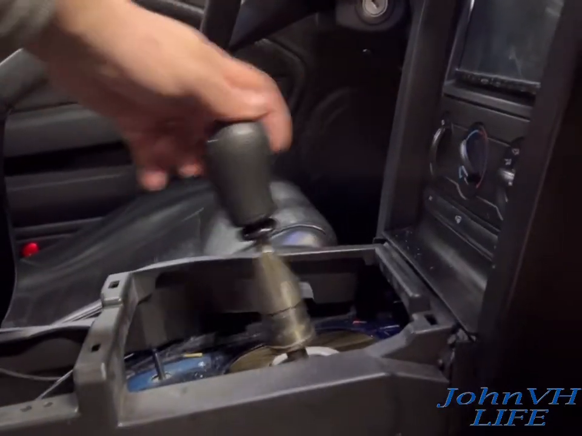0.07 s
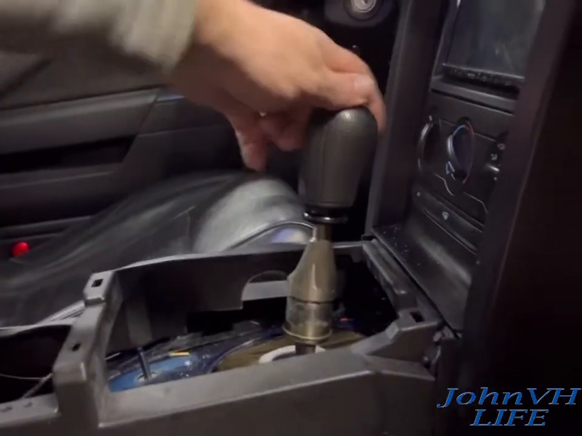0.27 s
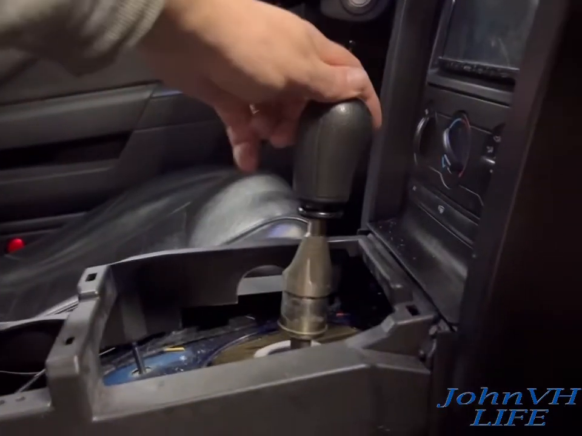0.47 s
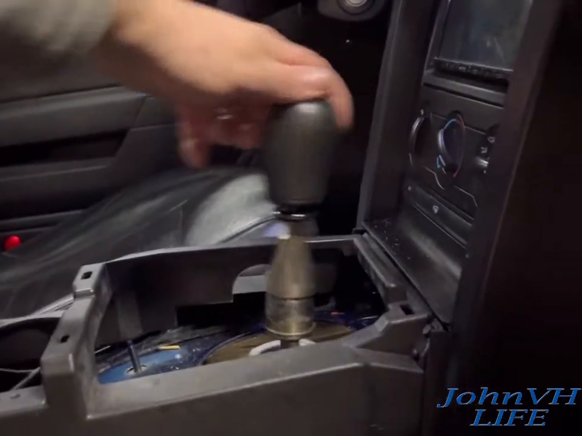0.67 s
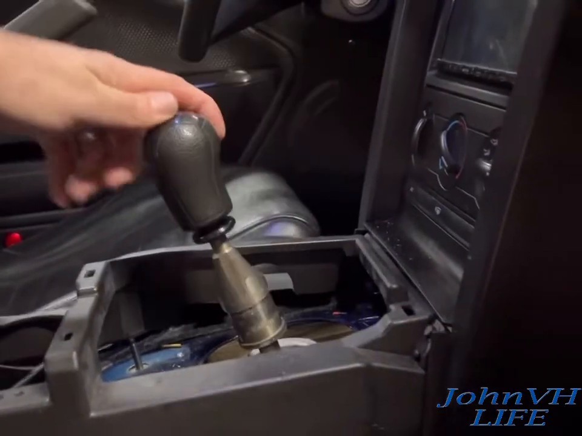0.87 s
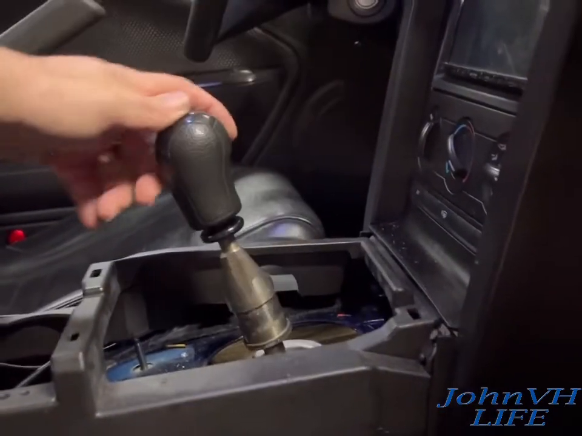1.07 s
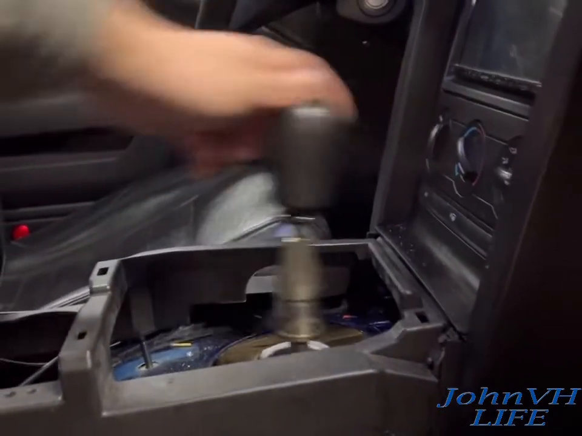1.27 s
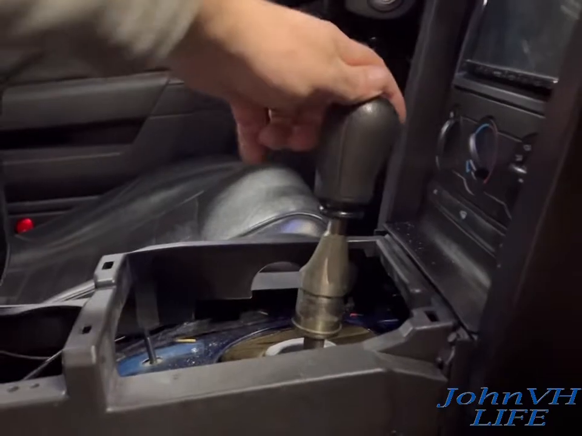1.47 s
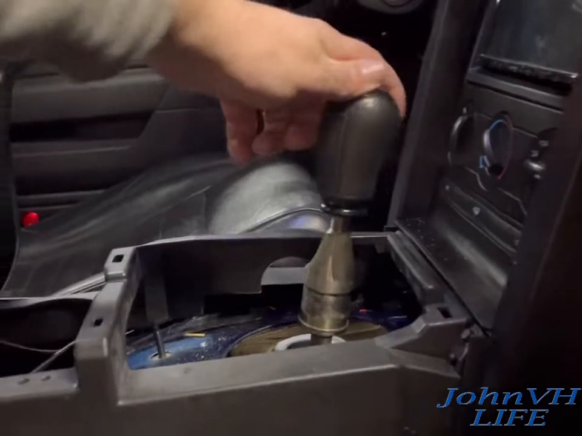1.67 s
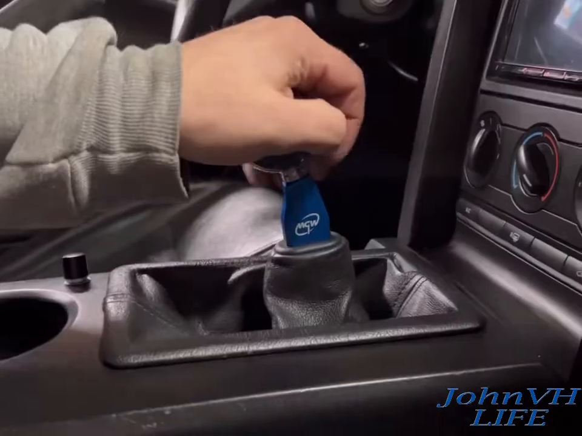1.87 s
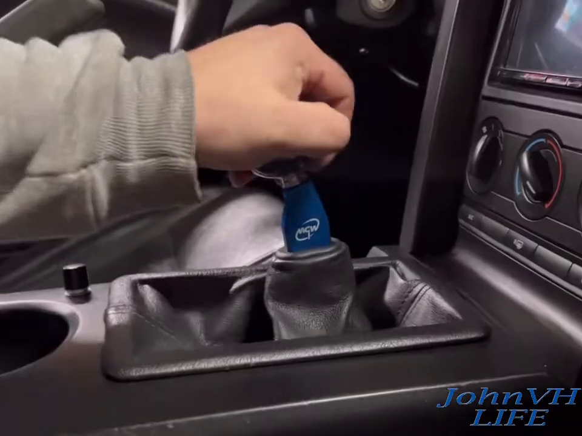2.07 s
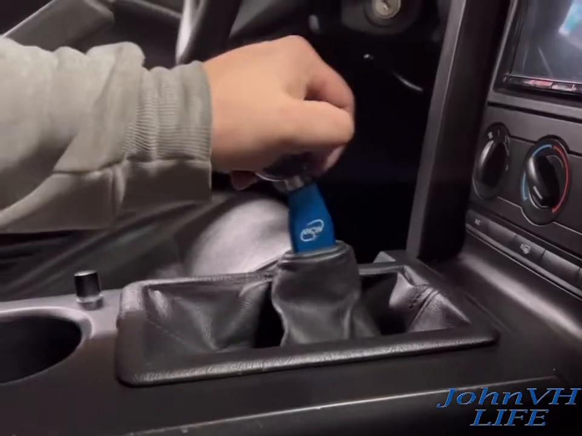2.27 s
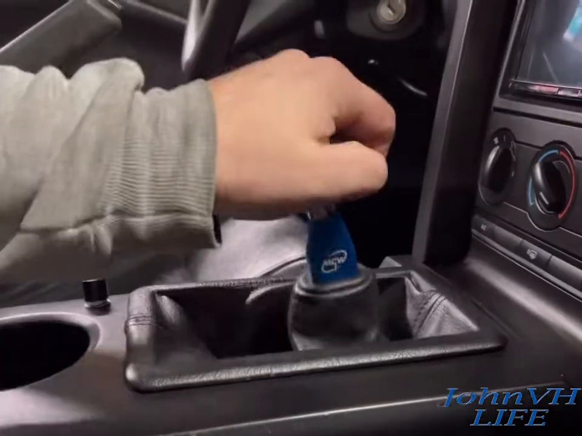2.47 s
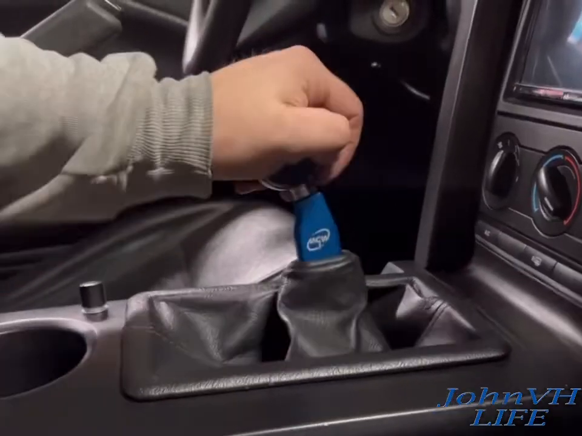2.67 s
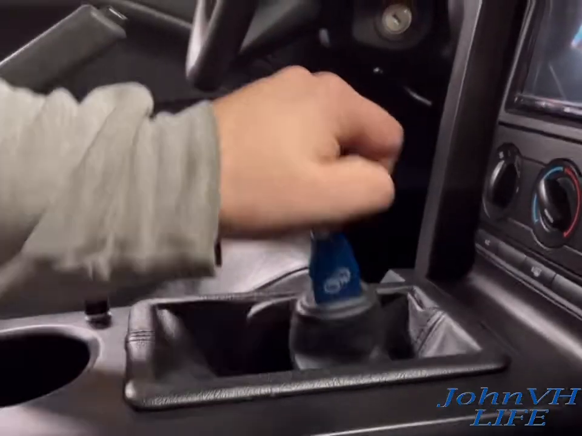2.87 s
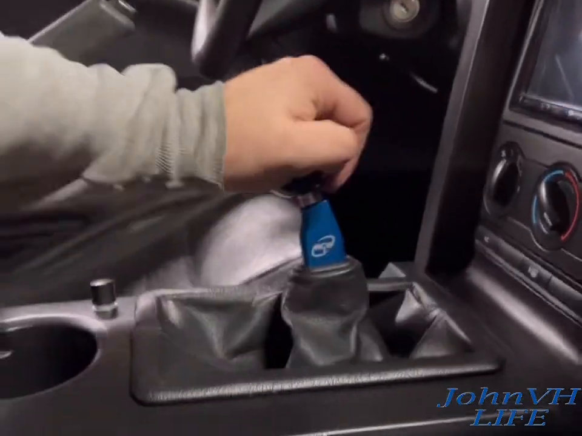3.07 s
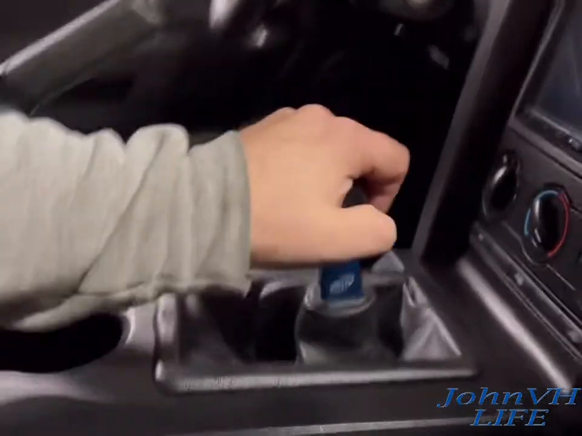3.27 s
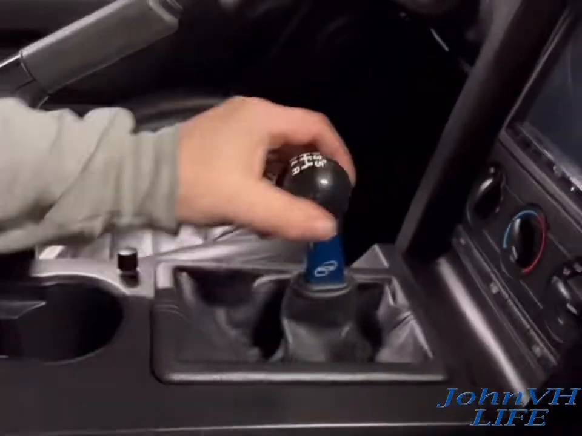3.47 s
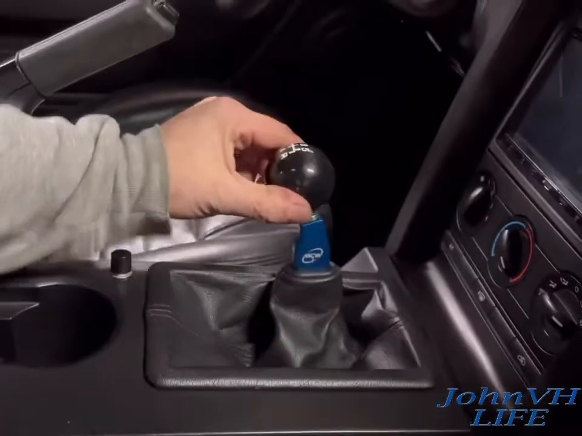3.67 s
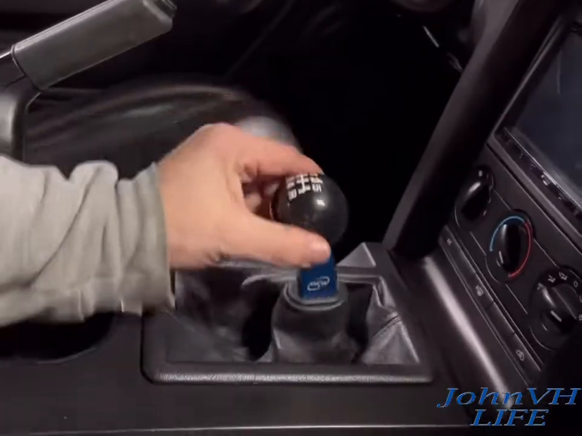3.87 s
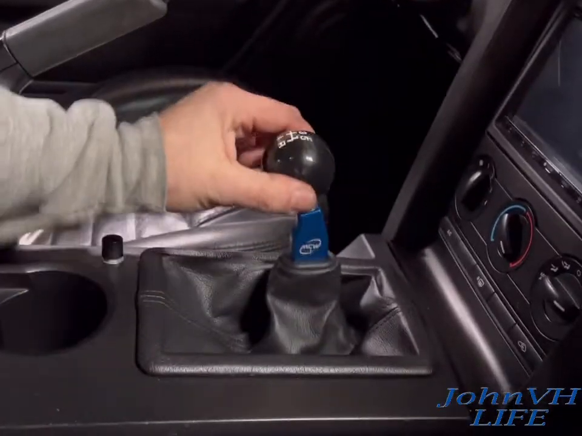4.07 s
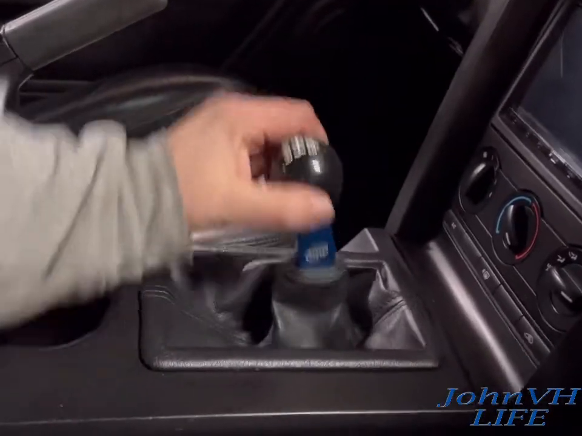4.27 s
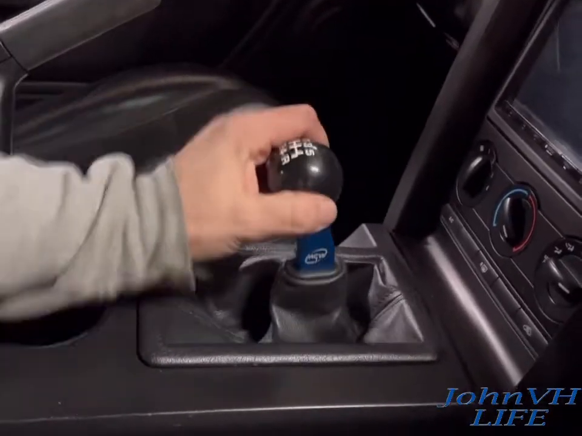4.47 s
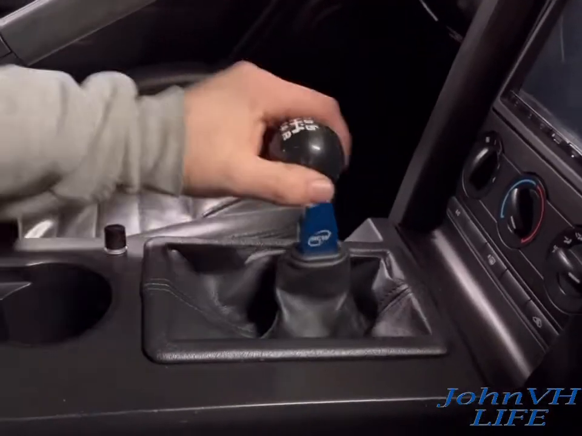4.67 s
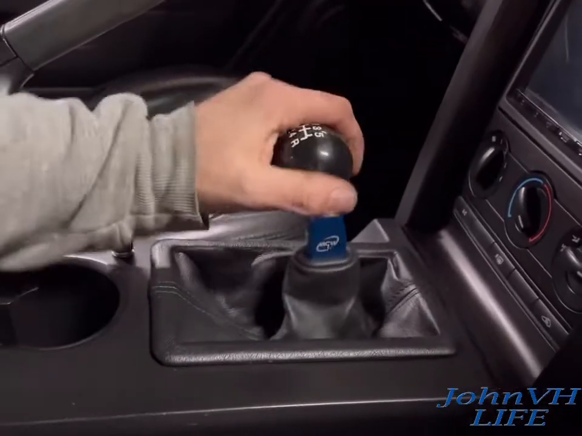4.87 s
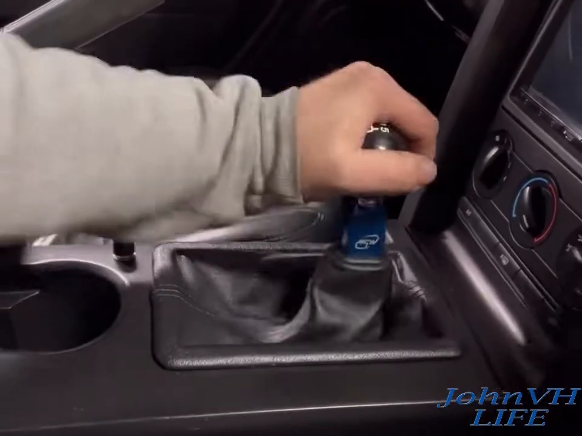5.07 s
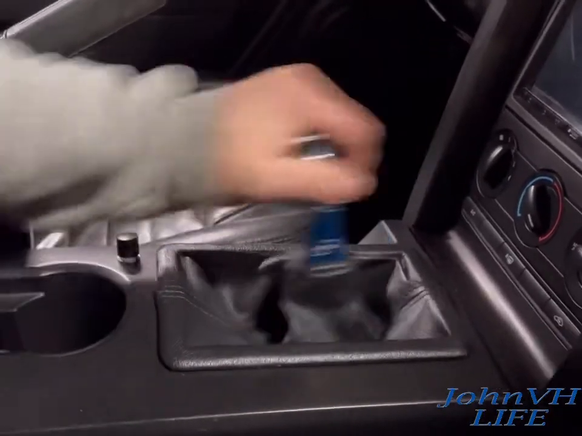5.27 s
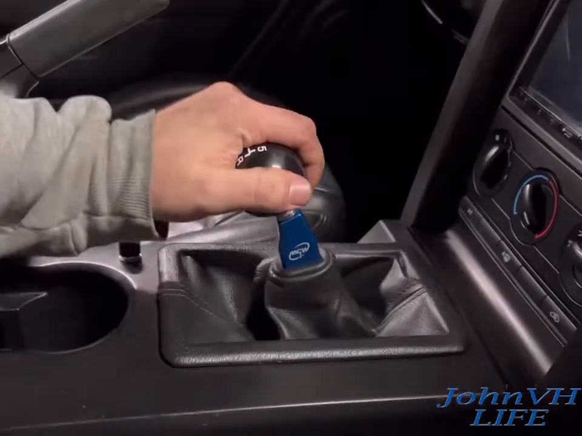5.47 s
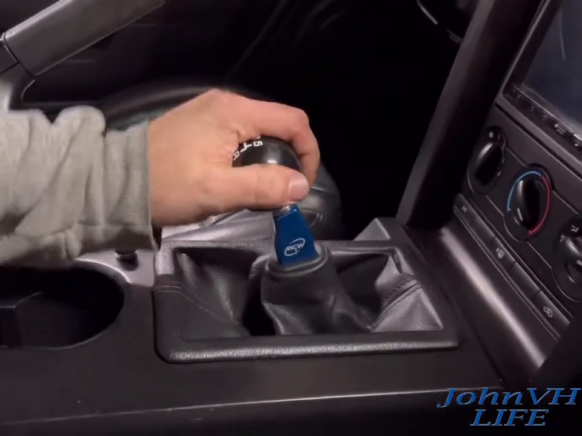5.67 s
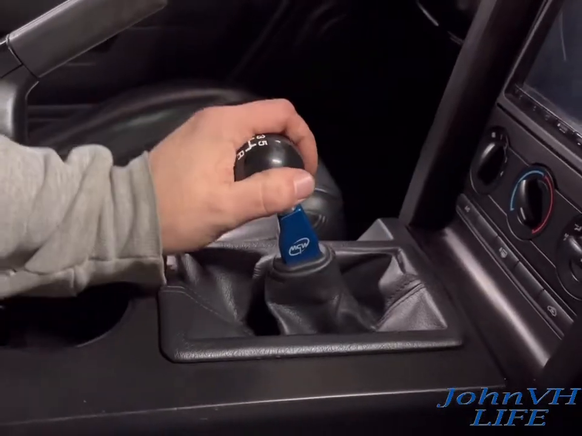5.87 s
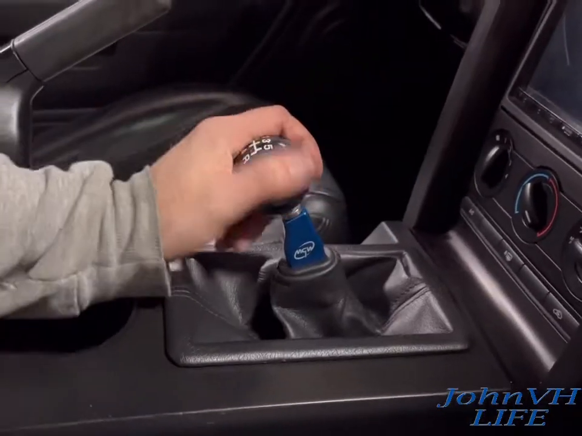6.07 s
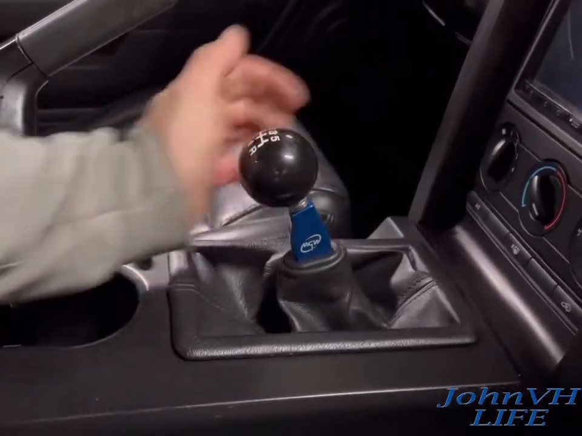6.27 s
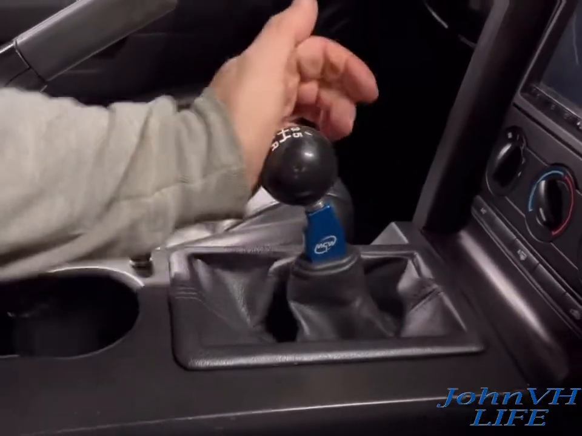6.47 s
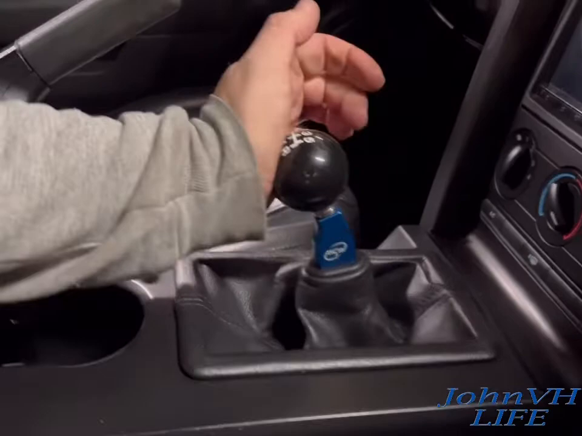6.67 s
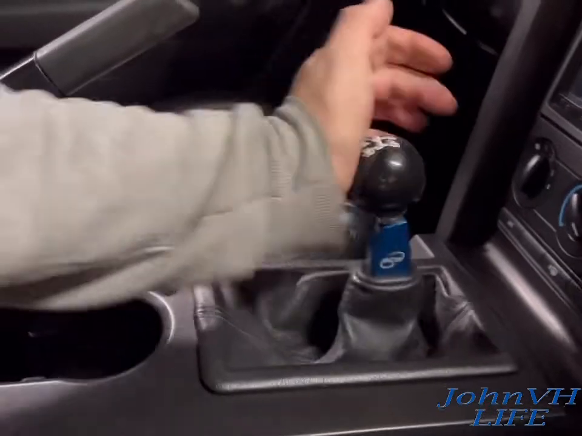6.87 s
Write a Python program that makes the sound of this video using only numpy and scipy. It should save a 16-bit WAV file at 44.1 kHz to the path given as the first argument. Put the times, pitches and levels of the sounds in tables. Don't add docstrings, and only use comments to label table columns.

```python
import sys
import numpy as np
from scipy import signal
from scipy.fft import rfft, irfft, next_fast_len
from scipy.io import wavfile
from scipy.ndimage import uniform_filter1d

SR = 44100
rng = np.random.default_rng(int(sys.argv[2]) if len(sys.argv) > 2 else 0)


def digitize_waveform(pressure):
    field = np.atleast_2d(pressure).T
    bounded = np.clip(field, -1, 1)
    quanta = np.round(bounded * 32767).astype(np.int16)
    wavfile.write(sys.argv[1], SR, quanta)


def voltage_ratio(decibels):
    exponent = np.asarray(decibels, float) / 20
    return 10 ** exponent


N = 304731
CUT_S = 1.84

# pitch_hz, level_db [rms]
HUM_PARTIALS = [(120, -68), (241, -62), (323, -77)]
# freq_hz, t60_s
ROOM_DECAY = [(250, 0.18), (700, 0.12), (2000, 0.064), (5000, 0.32), (11000, 0.054)]
# freq_hz, left_minus_right_db
STEREO_BALANCE = [(60, -3), (150, -3.5), (450, 0), (1000, -0.5), (2000, -0.5), (4500, 6), (9000, -1.5)]
# freq_hz, likeness [0-1]
STEREO_LIKENESS = [(100, 1), (250, 0.94), (500, 0), (1200, 0.2), (3000, 0), (7000, 0.5), (12000, 0.95)]
# freq_hz, lead_rad
STEREO_LEAD = [(0, 0), (430, 1.04), (860, 1.77), (1120, 0.42), (3620, 1.5), (4820, 3.5), (6290, 5),
               (6980, 7.5), (8350, 11), (9300, 9), (10900, 15.5), (15600, 11.5)]

# freq_hz, density_db [per Hz]
BARE_BED_COLOUR = [(25, -15.5), (42, 5), (87, -1.5), (145, -12.5), (248, -28), (325, -28), (403, -24.5),
                   (543, -30), (1190, -30), (2820, -41), (4580, -45), (6800, -46), (10000, -66.5),
                   (14000, -69.5)]
# freq_hz, density_db [per Hz]
BOOT_BED_COLOUR = [(25, -31), (52, 0.5), (76, -5.5), (150, -9), (200, -21), (280, -38), (400, -30.5),
                   (730, -41), (1850, -45.5), (2150, -44.5), (2450, -45.5), (5000, -48.5), (6600, -48),
                   (8000, -59), (10300, -50), (13000, -53.5)]
# time_s, effort_db [above rest]
BARE_HAND_EFFORT = [(0, 4.5), (0.25, 8), (0.5, -2), (0.66, -1.5), (0.78, 17.5), (0.92, 1.5), (1.09, 0),
                    (1.28, 9.5), (1.7, -3), (1.82, 15)]
# time_s, effort_db [above rest]
BOOT_HAND_EFFORT = [(1.9, -2), (2.2, 7.5), (2.39, 8), (2.51, 8), (2.62, 9.5), (2.76, 10), (3.07, 8.5),
                    (3.35, 10), (3.56, 7.5), (3.81, 9.5), (4.5, 9.5), (4.8, 3.5), (5.37, 12.5), (5.6, 3),
                    (6.2, 1.5), (6.6, 9.5), (6.77, 4), (6.85, 23), (6.91, 20.5)]
# crest_s, level_db, half_length_s
BARE_SLEEVE = [
    (0.073, -66, 0.13),
    (0.759, -62, 0.045),
]
# crest_s, level_db, half_length_s
BOOT_SLEEVE = [(2.199, -88, 0.18), (2.75, -78.5, 0.13), (3.379, -70.5, 0.23), (3.581, -80.5, 0.052),
               (4.502, -73, 0.21), (5.2, -70, 0.068), (5.348, -58.5, 0.036), (5.92, -74.5, .13),
               (6.53, -75, 0.07), (6.91, -62, 0.067)]
# crest_s, pitch_hz, peak_db, length_ms
RUB_WHISTLES = [
    (0.49, 4651, -62, 140),
    (1.97, 2083, -77.5, 130),
    (3.45, 2090, -71.5, 150),
]

# crest_s, pitch_hz, peak_db, length_ms
LEATHER_SQUEAKS = [(4.475, 3970, -61, 11), (4.6, 4020, -56, 14), (4.607, 5300, -58, 22),
                   (4.612, 3250, -65, 42), (4.682, 3200, -61.5, 20), (4.82, 3800, -69.5, 30),
                   (4.87, 3860, -73.5, 31), (4.94, 3820, -70, 20)]
# freq_hz, density_db [per Hz]
CREAK_COLOUR = [(200, 4.5), (330, 1), (700, -10), (1500, -23.5), (4000, -41)]
# start_s, crest_s, level_db, t60_s
GATE_SLIDES = [
    (2.067, 2.142, -59.5, 0.17),
    (2.548, 2.675, -59.5, 0.16),
    (2.923, 3.072, -50.5, 0.026),
    (4.986, 5.061, -43.5, 0.51),
    (5.253, 5.311, -36, 0.5),
    (6.775, 6.838, -56.5, 0.16),
]
# freq_hz, density_db [per Hz]
GRIND_COLOUR = [(400, -1.5), (880, -16), (1350, -13.5), (1900, -14), (2350, -14), (2550, -15.5),
                (2800, -12.5), (3600, -19.5), (5150, -16), (5800, -24), (8150, -28), (10400, -74),
                (12600, -49.5), (15900, -66.5)]
# pitch_hz, level_db [over the grit]
HOUSING_RINGS = [(872, 16), (1150, 14.5), (1604, 6), (2530, 12), (5240, 2)]

# crest_s, peak_db, pitch_hz, length_ms
BARE_BOOMS = [(0.103, -33.5, 108, 6.6), (0.13, -33, 66.7, 34), (0.195, -17.5, 73, 27.6),
              (0.55, -40.5, 91.7, 25), (0.722, -29, 120, 8.4), (0.745, -18.5, 73.6, 17),
              (0.781, -22, 90, 14), (0.806, -17, 86.6, 26), (0.886, -29.5, 58, 70), (0.987, -34, 53.5, 37),
              (1.09, -33.5, 85.6, 19), (1.25, -31, 93, 26), (1.295, -22, 72, 4.3), (1.325, -23.5, 86.5, 35),
              (1.785, -18.5, 80.5, 9.2)]
# crest_s, peak_db, pitch_hz, length_ms
ROCK_BOOMS = [(2.148, -32.5, 114.4, 25), (2.319, -20.5, 89.8, 14), (2.345, -21, 90, 9.1),
              (2.385, -35, 95.2, 34), (2.437, -17.5, 97.8, 15), (2.544, -34.5, 94, 46),
              (2.593, -18, 97.6, 15), (2.615, -18.5, 103, 11), (2.65, -22.5, 104.4, 39),
              (2.807, -23.5, 118, 13), (2.84, -15, 103.7, 16.5), (2.975, -21, 99, 5.3),
              (3.028, -15, 98, 32.6), (3.108, -25.5, 89.5, 18), (3.198, -20.5, 86.5, 20),
              (3.231, -16.5, 109, 18.7), (3.384, -25, 111, 12), (3.544, -28.5, 110.7, 23),
              (3.641, -33.5, 104.3, 18), (3.793, -18.5, 95, 8), (3.91, -28.5, 93.3, 17),
              (3.974, -26, 121.8, 59), (3.996, -19, 106.7, 11), (4.148, -28, 116.5, 18),
              (4.168, -19.5, 80, 11), (4.272, -31.5, 116.3, 8.2), (4.303, -21.5, 107.3, 26),
              (4.447, -28.5, 108, 19), (4.482, -27, 103, 27)]
# crest_s, peak_db, pitch_hz, length_ms
GEAR_BOOMS = [(4.621, -20.5, 108.4, 13.6), (4.999, -26, 140, 16), (5.033, -12.5, 96.8, 13),
              (5.049, -6, 88.4, 6.7), (5.064, -5.5, 94.4, 12), (5.245, -34, 78.3, 13.5),
              (5.292, -17, 92.6, 17), (5.313, -7, 96.4, 10), (5.358, -4.5, 101.6, 12.7),
              (5.441, -23, 85, 13), (5.57, -33, 57.8, 65), (5.759, -38.5, 53.6, 72),
              (6.355, -13, 108.5, 14.9), (6.514, -37, 84, 9.7), (6.813, -21.5, 117, 16),
              (6.838, -25.5, 104.3, 27), (6.869, -16.5, 92.7, 6.1), (6.89, -23.5, 97, 7.1)]

# start_s, pitch_hz, peak_db, t60_s
BARE_RINGS = [(0.094, 1156, -50, 0.14), (0.097, 502, -31.5, 0.08), (0.101, 840, -43.5, 0.11),
              (0.1615, 2740, -32.5, 0.012), (0.1618, 2270, -36, 0.029), (0.1621, 1740, -40, 0.028),
              (0.1624, 1262, -36, 0.044), (0.1627, 788, -41.5, 0.061), (0.164, 500, -22, 0.13),
              (0.708, 1074, -44, 0.066), (0.711, 472, -33.5, .13), (0.773, 1247, -33, 0.027),
              (0.774, 1071, -29, 0.038), (0.777, 491, -20.5, 0.056), (0.777, 2820, -51, 0.043),
              (0.779, 769, -34, 0.059), (0.79, 2050, -51.5, 0.27), (1.218, 793, -42.5, .13),
              (1.222, 445, -36.5, 0.26), (1.291, 3690, -47, 0.026), (1.292, 1257, -48, 0.084),
              (1.293, 583, -41, 0.05), (1.294, 466.5, -23.5, 0.083), (1.756, 1060, -45, 0.092),
              (1.76, 472, -34.5, 0.14), (1.81, 1286, -48, 0.077), (1.8255, 3470, -42, 0.06),
              (1.826, 1340, -34, 0.052), (1.8265, 1060, -25.5, 0.062), (1.827, 513, -28.5, 0.12)]
# start_s, pitch_hz, peak_db, t60_s
BOOT_RINGS = [(2.176, 257, -44, 0.069), (2.29, 334, -46.5, .07), (2.315, 313, -50, 0.076),
              (2.54, 730, -50.5, 0.13), (2.543, 336, -50.5, .07), (2.572, 580, -52, 0.056),
              (2.775, 353, -43.5, 0.067), (2.83, 312, -45.5, 0.095), (2.964, 705, -51, 0.26),
              (2.965, 562, -50.5, 0.17), (2.97, 358, -47.5, 0.13), (3.055, 1390, -43, 0.039),
              (3.056, 534, -47.5, 0.097), (3.07, 330, -47, 0.085), (3.158, 335, -43, 0.12),
              (3.16, 581, -54.5, 0.15), (3.34, 1070, -58, 0.079), (3.35, 395, -57, 0.21),
              (3.76, 572, -53.5, 0.18), (3.96, 528, -46, .1), (4.255, 1136, -63, 0.065),
              (4.27, 502, -55.5, 0.11), (4.565, 552, -53, 0.14), (4.965, 596, -46, 0.061),
              (4.968, 340, -50, 0.039), (5.027, 1030, -32.5, 0.02), (5.028, 530, -23, 0.053),
              (5.03, 337.6, -22.5, 0.075), (5.04, 1430, -45.5, .17), (5.05, 2080, -47.5, 0.079),
              (5.07, 1327, -54, .45), (5.235, 510, -45.5, 0.057), (5.282, 980, -41.5, 0.065),
              (5.288, 403, -27, 0.091), (5.323, 952, -19, 0.02), (5.324, 588, -23, 0.053),
              (5.325, 327, -22, 0.065), (5.326, 729, -18.5, 0.036), (5.335, 1130, -45, 0.15),
              (5.35, 492, -37, 0.19), (5.37, 880, -55.5, 0.83), (6.32, 584, -43, 0.072),
              (6.49, 518, -54, 0.15), (6.785, 910, -49, 0.1), (6.825, 937, -46, 0.065)]

# start_s, peak_db, treble_db [over peak]
DETENT_TICKS = [(0.081, -44, 2), (0.085, -37, -1.5), (0.142, -36.5, -0.5), (0.698, -34.5, 4),
                (0.75, -46, 0.5), (1.03, -52, -2), (1.078, -38.5, -4), (1.083, -41.5, -2),
                (1.199, -39.5, 3.5), (1.204, -43.5, -3), (1.267, -33.5, 8), (1.744, -41.5, 3.5),
                (1.818, -28, 1.5)]
# pitch_hz, level_db, t60_s
DETENT_MODES = [(3610, -4, .015), (3900, 0, .013), (4300, -1, .017), (5870, -12, .012), (8310, -6, .022),
                (9260, -9, .018), (14200, -14, .012)]
# freq_hz, density_db [per Hz]
DETENT_CRACK = [(500, -1), (1500, -13.5), (2800, -4.5), (4000, -7.5), (6000, -15.5), (8400, -9.5),
                (10300, -6.5), (14000, -18), (15900, -28.5)]
# start_s, peak_db, treble_db [over peak]
LOOSE_TICKS = [(6.141, -41.5, -33.5), (6.189, -43, -34), (6.237, -53, -43), (6.278, -43.5, -31),
               (6.295, -44, -32.5), (6.309, -40.5, -0.5), (6.319, -33.5, -32.5), (6.467, -43.5, -30.5),
               (6.497, -44, -27.5), (6.515, -41.5, -27.5), (6.586, -41.5, -26), (6.624, -38, -28.5),
               (6.64, -37, -27.5), (6.685, -37, -25), (6.696, -38.5, -21)]
# freq_hz, density_db [per Hz]
LOOSE_CRACK = [(250, 10.5), (600, -6.5), (1400, -20), (2500, -27.5), (6000, -44), (15900, -80)]
# start_s, peak_db, treble_db [over peak]
BARE_KNOCKS = [
    (0.093, -32, -16),
    (0.162, -21.5, -20.5),
    (0.709, -34, -14.5),
    (0.774, -18.5, -20),
    (1.212, -34, -23.5),
    (1.222, -35, -20),
    (1.289, -24, -24),
    (1.756, -34, -10),
    (1.81, -33, -17.5),
    (1.826, -19, -12.5),
]
# pitch_hz, level_db, t60_s
BARE_MODES = [(434, -19.5, 0.056), (427, -2.5, 0.087), (484, -6, 0.062), (560, -21.5, 0.036),
              (758, -9.5, 0.059), (1030, -10, 0.15), (1131, -10, 0.1), (1973, -26.5, 0.32),
              (2500, -29.5, 0.08), (3760, -29.5, 0.03), (4060, -29.5, 0.036)]
# freq_hz, density_db [per Hz]
BARE_CRACK = [(300, -50), (500, 3), (700, -4), (1200, -7.5), (2240, -19), (3100, -25.5), (4000, -26.5),
              (5200, -33.5), (7300, -53), (8400, -35), (10200, -74), (14500, -51.5), (15900, -76)]
# start_s, peak_db, treble_db [over peak]
ROCK_KNOCKS = [(2.129, -41.5, -16), (2.167, -39.5, 3), (2.178, -34.5, -10.5), (2.265, -48, 13.5),
               (2.288, -41.5, -39), (2.54, -54, -41), (2.573, -40.5, -25), (2.664, -36, -0.5),
               (2.677, -44, -11), (2.695, -36, -3), (2.78, -44.5, -39), (2.968, -52, -40),
               (3.057, -32.5, -2), (3.137, -44.5, -3), (3.156, -47.5, -37), (3.325, -43, -28.5),
               (3.345, -41.5, -37), (3.62, -46.5, -10), (3.77, -47, -22.5), (3.957, -43, -44),
               (4.261, -60.5, -26.5), (4.595, -58, -38)]
# start_s, peak_db, treble_db [over peak]
GEAR_KNOCKS = [(4.967, -35, -29.5), (5.012, -38.5, -24), (5.022, -26.5, -18), (5.03, -18.5, -21),
               (5.263, -32.5, -26), (5.287, -26.5, -13), (5.325, -14, -31.5), (6.781, -42, -34.5),
               (6.803, -32.5, -32.5), (6.823, -30, -29), (6.843, -31.5, -37), (6.878, -37, -34.5)]
# pitch_hz, level_db, t60_s
BOOT_MODES = [(352, 4, 0.054), (445, -3, 0.015), (585, -7.5, 0.1), (730, 0, 0.057), (790, -3, 0.035),
              (1060, -8, 0.038), (1340, -30, .25), (1416, -39, 0.024), (2480, -34.5, 0.051),
              (5200, -46, .03)]
# freq_hz, density_db [per Hz]
BOOT_CRACK = [(150, -39.5), (250, 8), (673, -14.5), (1240, -27), (2470, -33.5), (3750, -39.5), (5040, -43),
              (8340, -50.5), (10100, -78.5), (12900, -55.5), (15900, -75)]


def along(table, hz):
    table_hz, value = np.transpose(table)
    return np.interp(np.log(hz + 1), np.log(table_hz), value)


def colour(x, table, lo_hz=0, hi_hz=SR):
    hz = np.arange(x.shape[-1] // 2 + 1) * SR / x.shape[-1] + 1
    edges = 1 / (1 + (lo_hz / hz) ** 8) / (1 + (hz / hi_hz) ** 8)
    y = irfft(rfft(x) * voltage_ratio(along(table, hz)) * np.sqrt(edges), x.shape[-1])
    return y / np.sqrt(np.mean(y ** 2))


def fade60(t, t60):
    return np.exp(-np.log(1000) * t / t60)


def stereo_noise(size):
    mid, side = rfft(rng.standard_normal((2, size)))
    like = along(STEREO_LIKENESS, np.arange(len(mid)) * SR / size)
    mid = mid * np.sqrt((1 + like) / 2)
    side = side * np.sqrt((1 - like) / 2)
    return irfft(np.array([mid + side, mid - side]), size)


def long_noise(table, lo_hz=0, hi_hz=SR, gain=1):
    return colour(stereo_noise(N + 1)[:, :N + 1] * gain, table, lo_hz, hi_hz)[:, :N]


def walk(rate):
    hold = int(SR / rate)
    return uniform_filter1d(np.repeat(rng.standard_normal(N // hold + 1), hold), hold)[:N]


def add(out, x, s):
    i = max(int(s * SR), 0)
    n = min(x.shape[-1], N - i)
    out[..., i:i + n] += x[..., :n]


def echo(x, wet_db):
    t, tail = np.arange(SR // 2) / SR, 0
    for hz in 250 * 2 ** np.arange(6.):
        octave = signal.butter(2, [hz / np.sqrt(2), hz * np.sqrt(2)], "band", fs=SR, output="sos")
        band = signal.sosfilt(octave, stereo_noise(len(t)))
        tail = tail + band * fade60(t, along(ROOM_DECAY, hz)) * np.minimum(t / 0.0027, 1)
    tail = tail / np.sqrt(np.sum(tail ** 2) / 2)
    return x + voltage_ratio(wet_db) * signal.fftconvolve(x, tail, axes=1)[:, :N]


def hum():
    t, out = np.arange(N) / SR, 0
    for hz, db in HUM_PARTIALS:
        gain = voltage_ratio(db + walk(12))
        drift = np.cumsum(walk(30)) * 6 / SR
        out = out + np.sqrt(2) * gain * np.sin(2 * np.pi * hz * t + drift)
    return out


def bed(effort, brushes, air, rest_db, follow, flicker_db, top_db):
    t, out = np.arange(N) / SR, 0
    work = np.interp(t, *np.transpose(effort))
    sleeve = sum(voltage_ratio(db) * np.exp(-((t - s) / half) ** 2 / 2) for s, db, half in brushes)
    bands_hz = [(0, 200), (200, 2300), (2300, 9500), (10800, SR)]
    for (lo, hi), db, share, flick in zip(bands_hz, rest_db, follow, flicker_db):
        gain = voltage_ratio(db + share * work)
        if lo > 2000:
            gain = gain + sleeve * voltage_ratio(top_db * (hi == SR))
        gain = gain * voltage_ratio(flick * walk(60 if hi < SR else 9))
        out = out + gain * long_noise(air, lo, hi)
    return out


def patchy(x, patch_db):
    z = signal.stft(x, nperseg=512)[2]
    field = uniform_filter1d(rng.standard_normal(z.shape[1:]), size=3, axis=0)
    field = uniform_filter1d(field, size=14, axis=1)
    return signal.istft(z * voltage_ratio(patch_db * field / field.std()), nperseg=512)[1][:, :N]


def squeaks(table, stutter_hz, glide):
    out, t = np.zeros(N), np.arange(-7000, 7000) / SR
    for s, hz, db, ms in table:
        swell = np.exp(-(t * 1000 / ms) ** 2)
        add(out, voltage_ratio(db) * swell * np.sin(2 * np.pi * hz * (t + glide * t ** 2 / ms)), s + t[0])
    return out * walk(stutter_hz)


def creak(boom):
    early_s, share_db = 0.021, -23
    push = uniform_filter1d(np.abs(boom), int(0.037 * SR))
    push = np.roll(push, -int(early_s * SR)) * voltage_ratio(0.81 * walk(140))
    return voltage_ratio(share_db) * push * long_noise(CREAK_COLOUR)


def slides():
    t, level = np.arange(N) / SR, 0
    for start, crest, db, t60 in GATE_SLIDES:
        swell = np.clip((t - start) / (crest - start), 0, 1) ** 1.2
        level = level + voltage_ratio(db - 60 * np.maximum(t - crest, 0) / t60) * swell
    grit = long_noise(GRIND_COLOUR, gain=voltage_ratio(np.append(walk(260), 0)))
    housing = 0
    for hz, db in HOUSING_RINGS:
        b, a = signal.iirpeak(hz, 1 / 0.013, SR)
        housing = housing + voltage_ratio(db) * signal.lfilter(b, a, grit)
    return level * (grit + housing * (t > 4.9))


def booms(table, rebound_db, rebound_s):
    ring_db, ring_s, skew = -16, 0.052, 0.91
    out, t = np.zeros(N), np.arange(-4000, 12000) / SR
    for (s, db, hz, ms), turn in zip(table, rng.random((len(table), 2))):
        width = ms / 1000 / 1.92 * np.where(t < 0, skew, 1 / skew)
        shove = np.exp(-(t / width) ** 2 / 2)
        ring = voltage_ratio(ring_db) * np.exp(-np.abs(t) / ring_s) / (1 + np.exp(-t / 0.018))
        first = (shove + ring) * np.cos(2 * np.pi * (hz * t + turn[0]))
        bounce = np.exp(-((t - rebound_s) / 0.0089) ** 2 / 2)
        again = voltage_ratio(rebound_db) * bounce * np.cos(2 * np.pi * (hz * t + turn[1]))
        add(out, voltage_ratio(db) * (first + again), s + t[0])
    return out


def rings(table, rise_s, sag, sag_s, skew, rough_db):
    out, t = np.zeros((2, N)), np.arange(16384) / SR
    for s, hz, db, t60 in table:
        turn, side = rng.random(2)
        pitch_rub, level_rub = [np.interp(t, np.linspace(0, t[-1], 65), r) for r in rng.standard_normal((2, 65))]
        drop = sag / (1 + (hz / 650) ** 4)
        cycles = hz * (t - drop * (t - sag_s * (1 - np.exp(-t / sag_s)))) + 0.099 * pitch_rub
        shape = (1 - np.exp(-t / rise_s)) * fade60(t, t60) * np.cos(np.pi / 2 * t / t[-1])
        apart = skew * (side - .5) * np.array([[1], [-1]])
        tone = np.sin(2 * np.pi * (cycles + turn) + apart)
        add(out, voltage_ratio(db + rough_db * level_rub) * shape / shape.max() * tone, s)
    return out


def knocks(table, modes, crack, ms, ring_db, scatter_db, usual_db, side_db, grain_db, hard_hz, shortest):
    out, t = np.zeros((2, N)), np.arange(8192) / SR
    lead_s = .004
    since = np.maximum(t - lead_s, 0)
    hz, db, t60 = np.transpose(modes)[:, :, None]
    f = np.arange(len(t) // 2 + 1) * SR / len(t)
    for s, peak_db, treble_db in table:
        span = ms / 1000 * np.clip(voltage_ratio(0.44 * (usual_db - treble_db)), shortest, 1.7)
        grains = voltage_ratio(grain_db * np.repeat(rng.standard_normal(len(t) // 32), 32))
        chatter = np.exp(-since / span) * (1 - np.exp(-since / (.5 * span))) * grains
        snap = colour(stereo_noise(len(t)) * chatter, crack, lo_hz=370)

        detune, phase, level = rng.standard_normal((3, 2, len(modes), 1))
        tone = np.sin(2 * np.pi * hz * (1 + 0.0092 * detune[:1]) * t + phase * 0.16)
        mode_gain = voltage_ratio(db + scatter_db * level[:1] + side_db * level)
        body = (mode_gain * tone * fade60(t, t60)).sum(axis=1)
        drive = rng.standard_normal(2048) * chatter[:2048] ** 2
        drive = drive / np.sqrt(np.sum(drive ** 2))
        drive[int((lead_s + span / 4) * SR)] += 1
        ring = signal.fftconvolve(body, drive[None], axes=1)[:, :len(t)]

        hit = snap / np.abs(snap).max() + voltage_ratio(ring_db) * ring / np.abs(ring).max()
        tilt = voltage_ratio((treble_db - usual_db) / (1 + (hard_hz / (f + 1)) ** 2))
        hit = irfft(rfft(hit) * tilt, len(t))
        add(out, voltage_ratio(peak_db) * hit / np.abs(hit).max() * np.cos(np.pi / 2 * t / t[-1]), s - lead_s)
    return out


def bare_lever():
    metal = knocks(DETENT_TICKS, DETENT_MODES, DETENT_CRACK, ms=2.4, ring_db=4.0, scatter_db=2.5,
                   usual_db=-0.5, side_db=7.0, grain_db=12.0, hard_hz=2500, shortest=.6)
    metal += rings(BARE_RINGS, rise_s=0.0035, sag=0.12, sag_s=0.012, skew=0.48, rough_db=3.5)
    metal += knocks(BARE_KNOCKS, BARE_MODES, BARE_CRACK, ms=6.4, ring_db=-1.0, scatter_db=1.5,
                    usual_db=-33.0, side_db=-0.5, grain_db=3.5, hard_hz=2800, shortest=1.1)
    boom = booms(BARE_BOOMS, rebound_db=-9.5, rebound_s=0.04)
    return echo(metal, wet_db=-8.0) + voltage_ratio(-7.0) * hum() + boom


def booted_lever():
    metal = rings(BOOT_RINGS, rise_s=0.0017, sag=0.018, sag_s=0.031, skew=0.95, rough_db=2.5)
    metal += knocks(ROCK_KNOCKS + GEAR_KNOCKS, BOOT_MODES, BOOT_CRACK, ms=3.77, ring_db=-7.0, scatter_db=8.0,
                    usual_db=-24.5, side_db=0.0, grain_db=1.0, hard_hz=1020, shortest=0.39)
    metal += knocks(LOOSE_TICKS, BOOT_MODES, LOOSE_CRACK, ms=2.4, ring_db=-1.0, scatter_db=8.0,
                    usual_db=-26.0, side_db=1.0, grain_db=1.0, hard_hz=1020, shortest=0.37)
    boom = booms(ROCK_BOOMS, rebound_db=-9, rebound_s=0.042)
    boom += booms(GEAR_BOOMS, rebound_db=-16, rebound_s=0.03)
    low_cut = signal.butter(2, 52, "high", fs=SR, output="sos")
    leather = squeaks(LEATHER_SQUEAKS, stutter_hz=400, glide=11) + creak(boom)
    return echo(metal, wet_db=-9.0) + hum() + slides() + leather + signal.sosfiltfilt(low_cut, boom)


def scene():
    after = np.clip((np.arange(N) / SR - CUT_S) / 0.0014 + .5, 0, 1)
    bare_air = bed(BARE_HAND_EFFORT, BARE_SLEEVE, BARE_BED_COLOUR, rest_db=(-48.5, -58.5, -69.5, -91),
                   follow=(1.0, 0.59, 0.18, 0.72), flicker_db=(3.0, 1.25, 0.67, 2.5), top_db=-9.5)
    boot_air = bed(BOOT_HAND_EFFORT, BOOT_SLEEVE, BOOT_BED_COLOUR, rest_db=(-55.0, -66.0, -89.0, -108),
                   follow=(1.08, 0.92, 0.75, 1.2), flicker_db=(3.2, 1.4, 1.6, 3.5), top_db=-21.5)
    air = patchy(bare_air * (1 - after) + boot_air * after, patch_db=3.0)
    whistles = squeaks(RUB_WHISTLES, stutter_hz=60, glide=1.5)
    return bare_lever() * (1 - after) + booted_lever() * after + air + whistles


def top_cut(x):
    return signal.sosfilt(signal.butter(12, 16010, fs=SR, output="sos"), x)


def record(dry):
    edge = 4096
    dry = np.pad(dry, ((0, 0), (edge, edge)), mode="reflect")
    size = next_fast_len(N + 2 * edge)
    hz = np.arange(size // 2 + 1) * SR / size
    lead = np.exp(.5j * np.interp(hz, *np.transpose(STEREO_LEAD)))
    left = voltage_ratio(along(STEREO_BALANCE, hz) / 2) * lead
    response = 1 / np.sqrt(1 + (42 / (hz + 1)) ** 6)
    response = response * (hz < 15800)
    response = response * voltage_ratio(-14 * np.exp(-((hz - 10000) / 850) ** 4))
    mix = irfft(rfft(dry, size) * np.array([left, 1 / left]) * response, size)[:, edge:edge + N]
    return top_cut(mix)


dry = scene()
out = record(dry)
digitize_waveform(out)
```